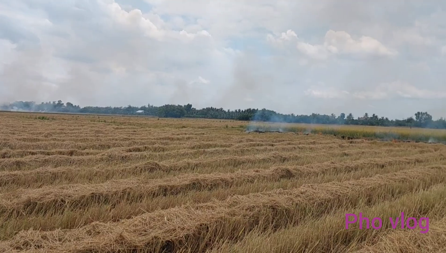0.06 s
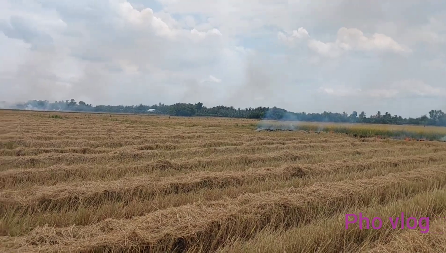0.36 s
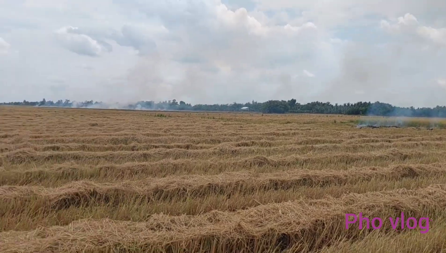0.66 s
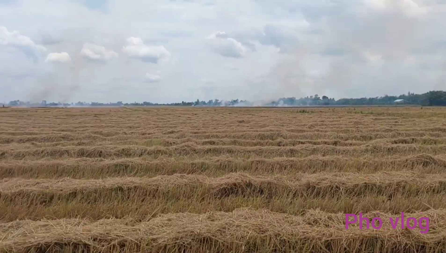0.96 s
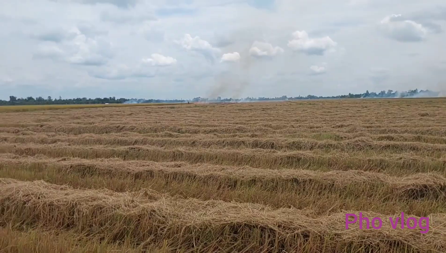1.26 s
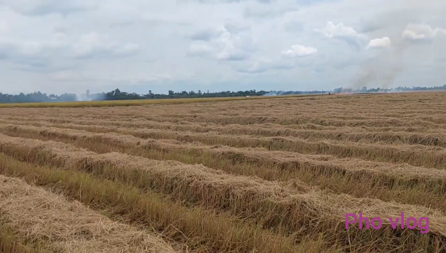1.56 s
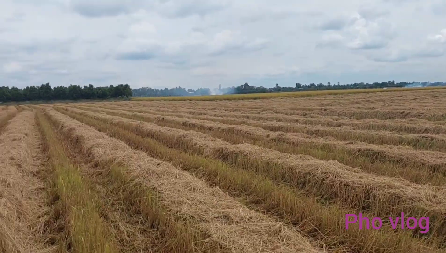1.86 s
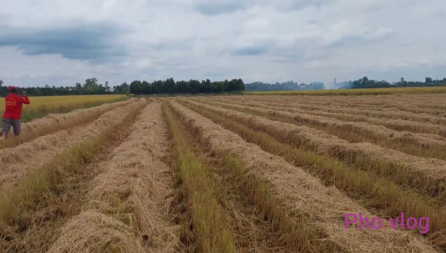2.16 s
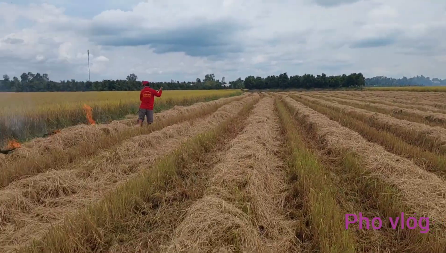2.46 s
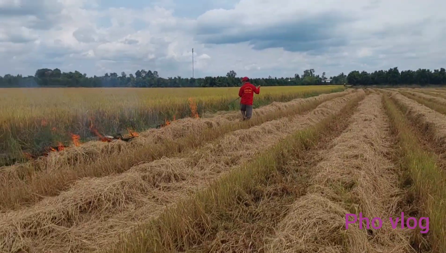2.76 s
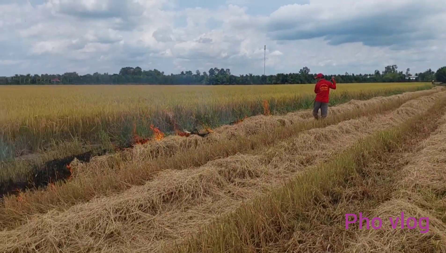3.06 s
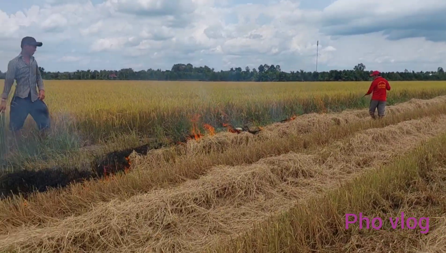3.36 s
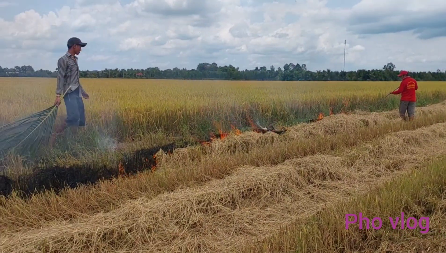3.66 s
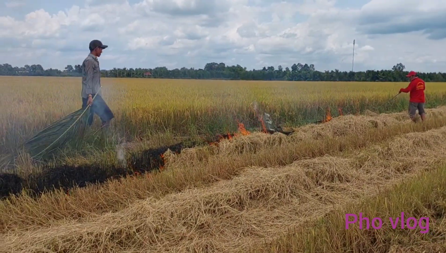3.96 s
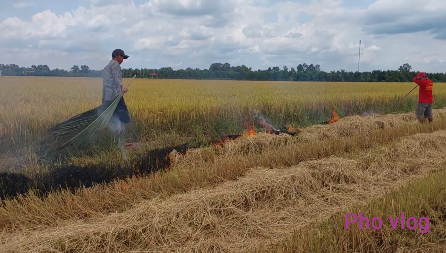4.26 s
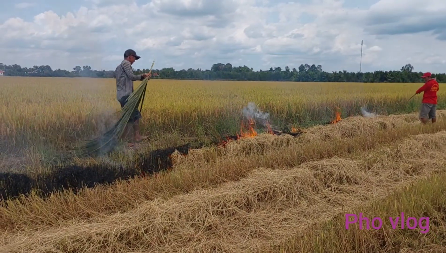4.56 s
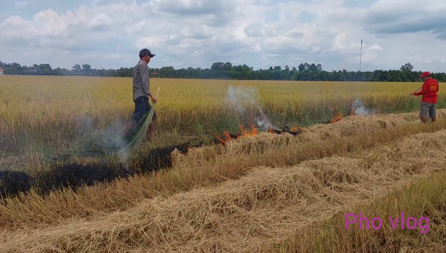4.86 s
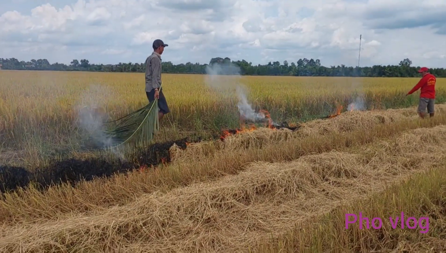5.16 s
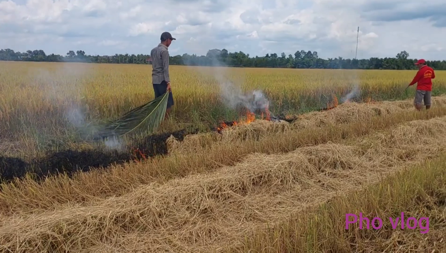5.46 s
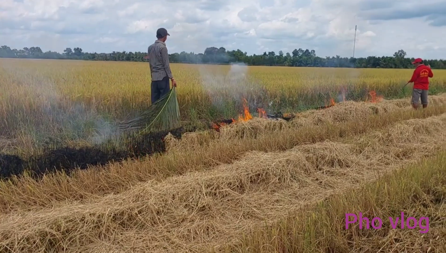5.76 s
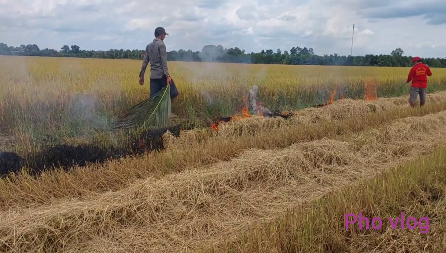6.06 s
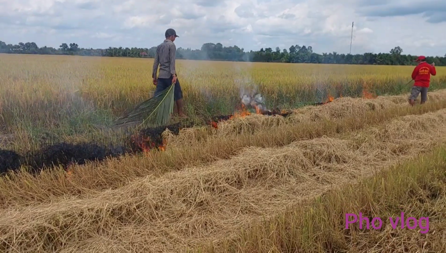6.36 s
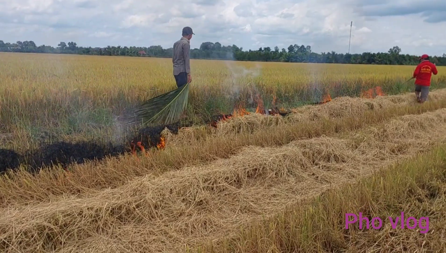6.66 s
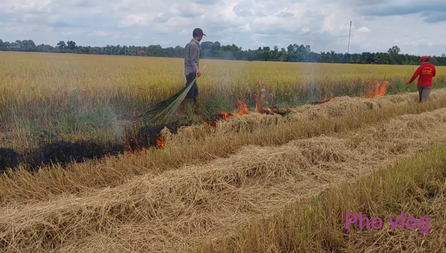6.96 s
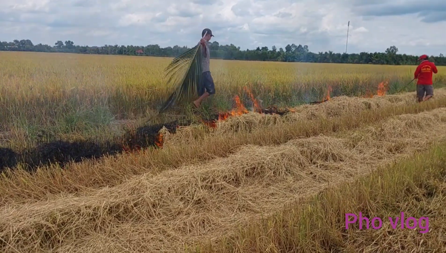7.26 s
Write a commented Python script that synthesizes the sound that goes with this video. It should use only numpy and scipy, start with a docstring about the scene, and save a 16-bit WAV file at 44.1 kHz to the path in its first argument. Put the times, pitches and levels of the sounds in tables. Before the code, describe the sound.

Dry straw burns in an open field for about seven and a half seconds. From the start there is a fine sizzle with small crackles and a soft low flutter of flame, while stalks burst in irregular, short, sharp pops. A faint engine drones far away, and light wind gives the microphone occasional low bumps. A strong pop comes at 0.2 seconds and the loudest at 1.2 seconds, together with a quick close brush of straw to the left. Between about 2.1 and 2.5 seconds a distant bird whistles four very faint notes. Straw rustles briefly again at 2.9 seconds as the fire flares a little. Brighter pops cluster from roughly 4.5 to 5.8 seconds, with a small gust around 5.2. After about 6 seconds a thin, high hiss of steam grows stronger, and the crackling carries on to the end.

```python
"""Rows of dry rice straw burn on an open field. From the start the fire sizzles, crackles and flutters,
an engine drones far away and light wind nudges the microphone ports. Stalks burst throughout, each
with a pressure pulse and a brief ring. At 1.2 s, with the loudest pop, straw brushes close by in a
swell of tiny snaps. A distant bird whistles four notes from 2.1 s, and straw rustles again at 2.9 s.
After about 6 s the faint hiss of steam from the stalks grows stronger."""
import sys
import numpy as np
from scipy import signal
from scipy.fft import rfft, irfft
from scipy.io import wavfile

SR = 44100
rng = np.random.default_rng(int(sys.argv[2]) if len(sys.argv) > 2 else 0)


def unload_audio(sound):
    """Save the sound as a 16-bit wav file, at the path given as the first command line argument."""
    columns = np.transpose(np.atleast_2d(sound))
    # keep every value between -1 and 1, then stretch to whole-number steps
    steps = np.round(np.clip(columns, -1, 1) * 32767)
    wavfile.write(sys.argv[1], SR, steps.astype(np.int16))


N = 331632
TIME = np.arange(N) / SR
FREQS = np.maximum(np.fft.rfftfreq(N, 1 / SR), 1)
SIDES = np.array([[.5], [-.5]])   # splits a left-minus-right difference between the channels

# The fire's strength. Each row: time in seconds, relative levels of flutter and of sizzle in dB.
FIRE_LEVELS = [(0.0, -66.5, -60.5), (0.38, -63, -62), (0.71, -62, -59), (0.9, -61.5, -57.5),
               (1.13, -70, -72.5), (1.28, -59, -55.5), (1.49, -58.5, -58.5), (2.14, -63, -59),
               (2.47, -64.5, -56.5), (2.79, -64, -56), (2.97, -55.5, -50.5), (3.56, -66.5, -57),
               (4.5, -64, -54), (4.79, -71, -62), (4.98, -65.5, -59.5), (5.17, -60, -55.5),
               (5.42, -66.5, -56), (6.09, -69.5, -61.5), (7.16, -60.5, -58), (7.52, -65, -55.5)]
# The steam's strength. Each row: time in seconds, level in dB.
STEAM_LEVELS = [(0, -76), (5.8, -74.5), (6.6, -60.5), (7.5, -62.5)]
# Directions of the fire and the pops. Each row: time in seconds, delay at the right port in ms.
FIRE_LAGS = [(0, -0.3), (.8, -0.32), (1.2, 0.4), (2.2, 0.36), (3, .38), (7.5, 0.4)]
POP_LAGS = [(0, -0.024), (.9, -0.24), (1.2, 0.16), (2, 0.48), (4.75, 0.36), (5.0, 0.19), (5.8, .12),
            (6.1, 0.25), (7.5, 0.16)]
# Spectra of the sources. Each row: frequency in Hz, relative spectral level in dB.
SIZZLE_SPECTRUM = [(1300, 4.5), (2200, -3), (3600, -1), (5200, 0.5), (6400, 0.5), (7250, 4.5), (8700, -3.5),
                   (11300, 3.5), (15200, 3.5), (17000, -14)]
CRACKLE_SPECTRUM = [(450, -18), (750, 4.5), (1300, -6), (1750, -3), (2300, -8.5), (3700, -1.5),
                    (7200, -5.5), (8900, -2.5), (12500, 0.5), (17000, 6)]
FLUTTER_SPECTRUM = [(120, 8), (280, 2), (450, -12.5), (720, -11.5), (1100, -24), (2200, -10), (3000, -18)]
STEAM_SPECTRUM = [(3300, -14), (4700, 12), (5500, 10), (7200, -12)]
WIND_SPECTRUM = [(20, -27), (38, 1), (60, 4.5), (80, -1), (105, -8), (190, -17), (330, -29.5)]
POP_SPECTRUM = [(50, -8), (170, 2), (330, 6), (480, 1), (750, 2.5), (1400, 1.5), (1800, 2.5), (2500, 3),
                (3800, -1.5), (7000, 1), (9000, -5), (12000, -0.5), (16000, -2.5)]
RUSTLE_SPECTRA = [
    [(70, -2.5), (200, -1), (420, -14), (750, -12.5), (1200, -15.5), (2200, -20.5), (3600, -8.5),
     (5500, -11.5), (8000, -17), (9500, -22.5), (13000, -18), (18000, -27)],
    [(80, -3.5), (300, -2.5), (560, -17.5), (850, -11.5), (1100, -17), (1600, -11.5), (2300, -5),
     (3300, -18), (7300, -9.5), (9000, -15.5), (13500, -11), (18000, -27)],
]   # one spectrum for each rustle
# Engine tones. Each row: frequency in Hz, rms level in dB, rms frequency deviation in Hz.
ENGINE_TONES = [(55.1, -52, 1.28), (45.2, -56.5, 6.75), (115.7, -61.5, 2.85)]
# Gusts. Each row: peak time in seconds, level in dB, half length in seconds, left minus right in dB.
WIND_GUSTS = [(0.106, -49, 0.21, -6), (0.869, -40.5, 0.023, -4), (1.187, -40, 0.051, -15.5),
              (1.308, -43.5, 0.023, -19), (3.095, -40.5, 0.013, -7), (3.328, -42, 0.032, -16),
              (3.444, -41, 0.029, -21), (4.841, -43.5, 0.023, 17), (5.05, -49, 0.091, 17),
              (5.197, -38, 0.029, 22), (6.694, -43.5, 0.012, -25), (6.814, -46, 0.048, -18),
              (7.34, -45, .12, -7.5)]
# The loudest bursting stalks. Each row: start in seconds, thump, crack and fizz levels in dB
# (rms over 10 ms, before colouring), resonance in Hz.
LOUD_STALKS = [(0.0466, -60, -63, -49.5, 13000), (0.1227, -82, -79, -45, 11860),
               (0.208, -34, -42, -44, 2900), (0.2771, -62, -57.5, -47, 12000),
               (0.3113, -51, -53.5, -54.5, 1450), (0.433, -56, -53, -58, 590), (0.5827, -52, -55, -63, 730),
               (0.6783, -56.5, -52.5, -51, 860), (0.9687, -49, -69, -71, 645),
               (1.2207, -19.5, -31, -29, 616), (1.5466, -51.5, -49.5, -52, 850),
               (1.8659, -48.5, -52.5, -46.5, 600), (1.9283, -47, -48, -44, 820),
               (2.2623, -48, -60, -50.5, 1520), (2.6159, -50.5, -50.5, -44, 1940),
               (2.8037, -56, -51.5, -45.5, 1800), (2.8394, -56, -56, -36.5, 12000),
               (3.0655, -45, -63, -60, 750), (3.2612, -46.5, -63, -45.5, 12000),
               (3.2974, -45, -45.5, -74, 770), (3.4661, -49, -54, -48.5, 1380),
               (3.6351, -67, -60, -44, 12000), (3.8039, -50, -48.5, -38, 12000),
               (4.0373, -59.5, -48, -52.5, 2610), (4.0629, -62, -68, -46, 11900),
               (4.2817, -52.5, -50, -70, 1500), (4.5134, -51.5, -50, -45, 12000),
               (4.6058, -48.5, -46, -42, 7400), (4.7111, -45, -39, -46, 1400),
               (4.7497, -59, -70, -42.5, 12900), (5.0104, -59.5, -38.5, -48.5, 2680),
               (5.029, -76, -62, -41, 11900), (5.1061, -47, -44.5, -40.5, 1220),
               (5.2118, -58, -49.5, -40, 12000), (5.2538, -43.5, -43, -46.5, 725),
               (5.4408, -47, -38.5, -40.5, 1280), (5.735, -50.5, -43, -42, 7100),
               (6.0195, -56, -53.5, -46.5, 1390), (6.0586, -67, -51, -43.5, 4600),
               (6.2601, -81.5, -64, -44, 13000), (6.7337, -64, -64.5, -41.5, 4800),
               (7.0546, -48.5, -55, -59, 780), (7.1795, -53.5, -44, -54, 2200),
               (7.2498, -63, -55, -44.5, 13000)]
# Bands of thump, crack and fizz. Each row: lower edge in Hz, upper edge in Hz.
POP_BANDS_HZ = [(150, 900), (900, 3500), (3500, 16000)]
# Each entry: the frequency in Hz at which that band's gain is set.
POP_CENTRES_HZ = [680, 1700, 4500]
# Extremes of the lesser stalks. Each gives: thump, crack and fizz levels in dB, resonance in Hz.
THIN_STALK, THICK_STALK = (-71.5, -65.5, -52.5, 13002), (-56.5, -54, -54.5, 809)
# Straw brushing past. Each row: time when closest in seconds, relative peak level in dB, half length in
# seconds, steepness of the fall, treble left minus right in dB, extra dB of treble per dB of swell.
STRAW_PASSES = [(1.231, -24, 0.0077, 1.16, 14, 1), (2.913, -27, 0.033, 2.57, 7.5, 0.3)]
# Bird notes. Each row: start and length in seconds, first pitch, last pitch and arch in Hz, level in dB.
BIRD_NOTES = [(2.063, 0.13, 1245, 1155, 6, -63.5), (2.18, 0.058, 1000, 1070, -3, -67),
              (2.313, .055, 1000, 1090, 3, -69), (2.41, 0.082, 1090, 1060, 80, -64)]
# Mismatch of the microphone ports. Each row: frequency in Hz, left minus right in dB.
PORT_BALANCE = [(100, -0.5), (600, 0), (1300, -3.5), (2400, -3.5), (4400, 2.5), (8000, 3), (15000, -1)]


def from_db(db):
    """Amplitude grows tenfold for every 20 dB."""
    return 10 ** (np.asarray(db) / 20)


def unit_rms(x):
    """Normalisation to a mean power of 1."""
    return x / np.sqrt(np.mean(x ** 2) + 1e-20)


def in_time(rows):
    """Linear interpolation of a curve's columns at every sample."""
    times, *columns = np.transpose(rows)
    return [np.interp(TIME, times, column) for column in columns]


def at_hz(points, freqs=FREQS):
    """Interpolation of a spectrum along a logarithmic frequency axis."""
    hz, values = np.transpose(points)
    return np.interp(np.log(freqs), np.log(hz), values)


def noise(spectrum, tilt_db=0):
    """Spectral shaping of white noise, tilted in dB per octave and cut steeply past its ends; rms 1."""
    skirts = (1 + (spectrum[0][0] / FREQS) ** 8) * (1 + (FREQS / spectrum[-1][0]) ** 8)
    gain = from_db(at_hz(spectrum) + tilt_db * np.log2(FREQS)) / np.sqrt(skirts)
    return unit_rms(irfft(gain * rfft(rng.standard_normal(N)), N))


def drift(rate_hz):
    """Low-pass filtered noise gives a slow random fluctuation; rms 1."""
    return unit_rms(irfft(rfft(rng.standard_normal(N)) / (1 + (FREQS / rate_hz) ** 2), N))


def two_ports(x, lag_ms):
    """A path difference delays the sound at the right port."""
    late = np.arange(N) - np.round(lag_ms * SR / 1000).astype(int)
    return np.array([x, x[np.clip(late, 0, N - 1)]])


def spread_noise(spectrum, lag_ms, direct_share):
    """Direct sound from one direction and a diffuse field add in power."""
    direct = two_ports(noise(spectrum), lag_ms)
    diffuse = np.array([noise(spectrum), noise(spectrum)])
    return np.sqrt(direct_share) * direct + np.sqrt(1 - direct_share) * diffuse


def grains(per_s, size_db, decay_ms):
    """Shot-noise envelope: random snaps, many small and few large, decay exponentially; rms 1."""
    sizes = from_db(size_db * np.minimum(rng.exponential(1, N), 3.5))
    energy = (rng.random(N) < per_s / SR) * sizes ** 2
    retained = np.exp(-2000 / (decay_ms * SR))
    return unit_rms(np.sqrt(signal.lfilter([1], [1, -retained], energy + 1e-18)))


def minimum_phase(gain_db):
    """Causality: a response with these gains in which nothing sounds early."""
    cepstrum = irfft(np.log(from_db(gain_db)))
    fold = 1 + np.sign(np.fft.fftfreq(len(cepstrum)))
    return np.exp(rfft(cepstrum * fold))


def sizzle(level_db, lag_ms):
    """The tiny snaps of fine leaves overlap into nearly diffuse shot noise."""
    hiss = from_db(level_db) * spread_noise(SIZZLE_SPECTRUM, lag_ms, direct_share=0.052)
    return hiss * grains(per_s=1400, size_db=-1.5, decay_ms=1.2)


def crackle(level_db, lag_ms, per_s, size_db, decay_ms, tilt_db, patches):
    """Patches of flame snap as incoherent sources, each with its own brightness and angle."""
    out = 0
    for place in np.linspace(-1, 1, patches):
        envelope = grains(per_s * from_db(2.2 * drift(5.8)), size_db, decay_ms)
        snaps = envelope * noise(CRACKLE_SPECTRUM, tilt_db + 0.5 * place)
        out += two_ports(snaps, lag_ms + 0.092 * place)
    return from_db(level_db) * unit_rms(out)


def flames(level_db, lag_ms):
    """Unsteady burning radiates low-frequency noise: a soft flutter with short puffs."""
    flutter = from_db(level_db + 3) * spread_noise(FLUTTER_SPECTRUM, lag_ms, direct_share=0.91)
    puffs = noise(FLUTTER_SPECTRUM) * grains(per_s=77, size_db=6, decay_ms=4.3)
    return flutter + from_db(level_db + 2.5) * two_ports(puffs, lag_ms)


def steam(lag_ms):
    """Steam escaping from the stalks hisses as amplitude-modulated noise near 5 kHz."""
    level_db = in_time(STEAM_LEVELS)[0] + 2 * drift(6.8)
    hiss = from_db(level_db) * spread_noise(STEAM_SPECTRUM, lag_ms, direct_share=0.35)
    return hiss * grains(per_s=1500, size_db=5, decay_ms=0.72)


def fire():
    """Common modulation: sizzle, snaps and ticks rise and fall together, over flames and steam."""
    flutter_db, sizzle_db = in_time(FIRE_LEVELS)
    lag_ms, = in_time(FIRE_LAGS)
    flutter_db += 1.5 * drift(14)   # the flames lick and sink
    sizzle_db += 1.17 * drift(11)
    leaves = sizzle(sizzle_db + 2.1, lag_ms)
    snaps = crackle(sizzle_db - 0.73, lag_ms, per_s=40, size_db=6, decay_ms=3.1, tilt_db=-1.5, patches=4)
    ticks = crackle(sizzle_db - 5, lag_ms, per_s=17, size_db=9, decay_ms=0.33, tilt_db=-0.5, patches=3)
    return leaves + snaps + ticks + flames(flutter_db, lag_ms) + steam(lag_ms)


def engine():
    """Propagation over the field makes the low firing tones waver in frequency, phase and amplitude."""
    out = 0
    for hz, level_db, deviation_hz in ENGINE_TONES:
        phase = 2 * np.pi * np.cumsum(hz + deviation_hz * drift(6.37)) / SR
        tone = np.sin(phase + SIDES * 0.39 * drift(2.1)) * from_db(2.6 * drift(36))
        out += from_db(level_db) * unit_rms(tone)
    return out


def wind(breeze_db=-55):
    """Breeze and gusts add in power as low pressure fluctuations, now at one port, now at the other."""
    power = from_db(breeze_db) ** 2
    for peak_s, peak_db, half_s, side_db in WIND_GUSTS:
        power += from_db(peak_db + SIDES * side_db) ** 2 * np.exp(-((TIME - peak_s) / half_s) ** 2)
    return np.sqrt(power) * spread_noise(WIND_SPECTRUM, lag_ms=0, direct_share=0.9)


def pops(stalks, scatter_ms=2.88, field_db=-50, field_ms=12, ring_db=6, ring_octaves=.18, size=4096):
    """A stalk bursts with a pressure pulse and resonates; stubble scatters short waves into a tail."""
    out = np.zeros((2, N + SR))
    ms = TIME[:size] * 1000
    freqs = np.maximum(np.fft.rfftfreq(size, 1 / SR), 1)
    bands = [(freqs > low) & (freqs < high) for low, high in POP_BANDS_HZ]
    scattered = 1j * freqs / (1400 + 1j * freqs)   # long waves pass the stubble untouched
    for start_s, thump_db, crack_db, fizz_db, ring_hz in stalks:
        # thick stalks crack for longer than thin ones that only fizz
        decay_ms = scatter_ms * np.clip(2 + 0.076 * (crack_db - fizz_db), .5, 1.3)
        tail = 0.23 * np.exp(-ms / decay_ms) + from_db(field_db) * np.exp(-ms / field_ms)
        shared, *own = rng.standard_normal((3, size))
        burst = 1 + scattered * rfft(tail * (0.36 * shared + .5 * np.array(own)))
        burst *= minimum_phase(ring_db / (1 + (np.log2(freqs / ring_hz) / ring_octaves) ** 2))
        # mean square over 10 ms in each band
        powers = [np.sum(abs(burst[:, band]) ** 2) / size / (.01 * SR) for band in bands]
        gains_db = np.array([thump_db, crack_db, fizz_db]) - 10 * np.log10(powers)
        colour_db = at_hz(list(zip(POP_CENTRES_HZ, gains_db)), freqs) + at_hz(POP_SPECTRUM, freqs)
        left, right = irfft(burst * minimum_phase(colour_db))
        lag_ms = np.interp(start_s, *np.transpose(POP_LAGS)) + 0.05 * rng.standard_normal()
        at = round(start_s * SR)
        late = at + round(lag_ms * SR / 1000)
        out[0, at:at + size] += left
        out[1, late:late + size] += right
    return out[:, :N]


def lesser_stalks(count=46, spread_db=1):
    """Resonance falls with size: random thick stalks thump, thin ones fizz, louder as the fire flares."""
    when, thickness = rng.random((2, count, 1))
    start_s = when * N / SR
    times, _, sizzle_db = np.transpose(FIRE_LEVELS)
    flare_db = np.interp(start_s, times, sizzle_db) - np.mean(sizzle_db)
    levels_db = THIN_STALK[:3] + thickness * np.subtract(THICK_STALK[:3], THIN_STALK[:3])
    levels_db += 0.28 * flare_db - spread_db * rng.standard_normal((count, 1))
    ring_hz = THIN_STALK[3] * (THICK_STALK[3] / THIN_STALK[3]) ** thickness
    return np.hstack([start_s, levels_db, ring_hz]).tolist()


def rustles(reach_s=0.17, approach_slope=0.78):
    """Level falls with distance: the dense snaps of passing straw are loudest and brightest up close."""
    out = 0
    treble_share = at_hz([(1200, 0.095), (3000, 0.65)])
    for row, spectrum in zip(STRAW_PASSES, RUSTLE_SPECTRA):
        closest_s, peak_db, half_s, steepness, pan_db, brightening = row
        t = TIME - closest_s
        distance_db = 10 * np.log10(1 + (t / half_s) ** 2)
        release_db = 20 * np.log10(1 + (t / reach_s) ** 10)   # beyond reach the straw is out of touch
        swell_db = -steepness * np.where(t < 0, approach_slope, 1) * distance_db - release_db
        straw = spread_noise(spectrum, lag_ms=.33, direct_share=0.77)
        straw *= grains(per_s=3200, size_db=1.5, decay_ms=0.77)
        treble = irfft(treble_share * rfft(straw), N)
        treble_gain = from_db(brightening * swell_db + SIDES * pan_db)
        out += from_db(peak_db + swell_db + 2) * (straw - treble + treble_gain * treble)
    return out


def bird():
    """Each faint whistle is a frequency-modulated sine that swells and fades along an arched glide."""
    out = 0
    for start_s, length_s, first_hz, last_hz, arch_hz, level_db in BIRD_NOTES:
        along = np.clip((TIME - start_s) / length_s, 0, 1)
        arch = 1 - (2 * along - 1) ** 2
        hz = first_hz + (last_hz - first_hz) * along + arch_hz * arch
        phase = 2 * np.pi * np.cumsum(hz * (1 + 0.0061 * drift(60))) / SR
        out += from_db(level_db) * np.sqrt(arch) * np.sin(phase)
    return out


def scene():
    """Superposition: the pressures of all the sources add at each port."""
    return fire() + pops(LOUD_STALKS + lesser_stalks()) + rustles() + wind() + engine() + bird()


def record(dry, cutoff_hz=15900):
    """The ports differ in frequency response; saturation rounds the peaks and a low-pass cuts the top."""
    coloured = irfft(rfft(dry) * from_db(SIDES * at_hz(PORT_BALANCE)), N)
    low_pass = signal.ellip(10, .1, 80, cutoff_hz, fs=SR, output="sos")
    return signal.sosfilt(low_pass, np.tanh(coloured))


dry = scene()
out = record(dry)
unload_audio(out)
```